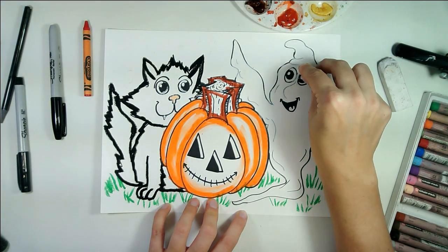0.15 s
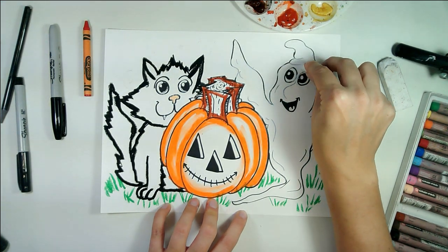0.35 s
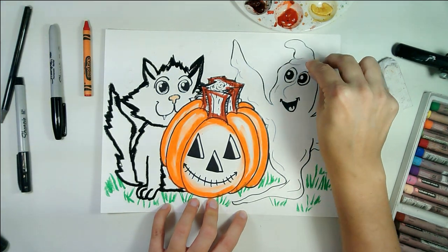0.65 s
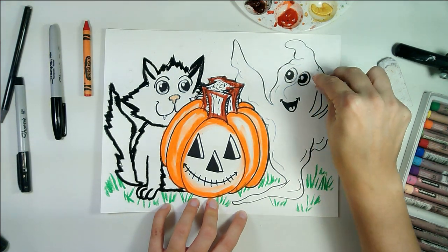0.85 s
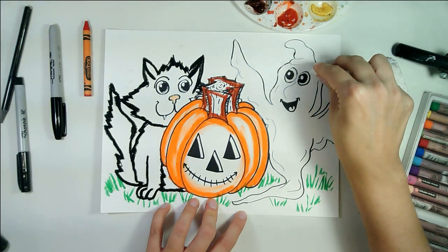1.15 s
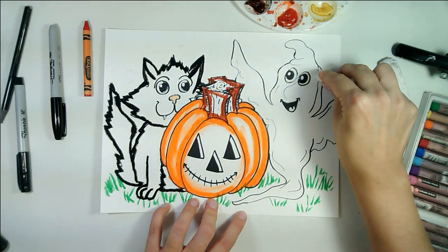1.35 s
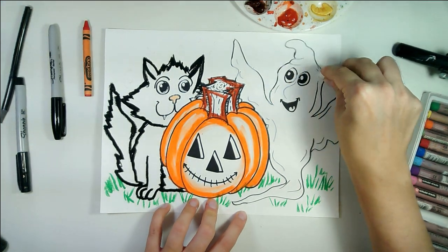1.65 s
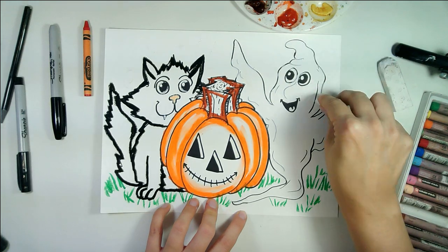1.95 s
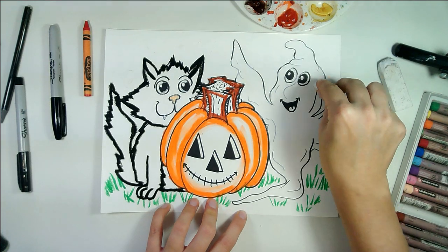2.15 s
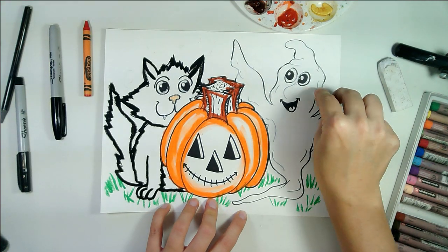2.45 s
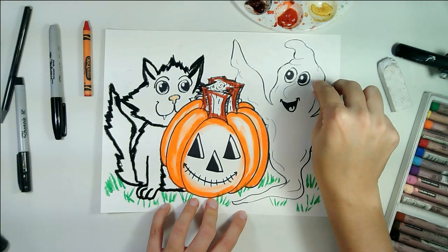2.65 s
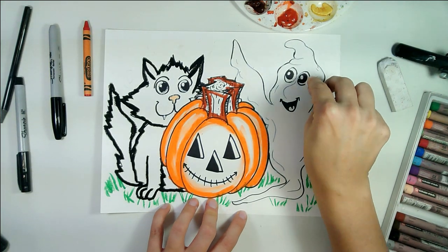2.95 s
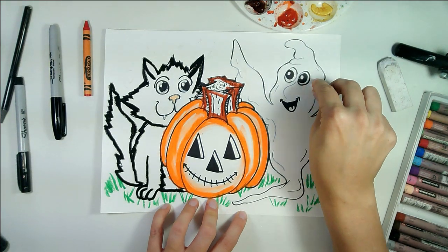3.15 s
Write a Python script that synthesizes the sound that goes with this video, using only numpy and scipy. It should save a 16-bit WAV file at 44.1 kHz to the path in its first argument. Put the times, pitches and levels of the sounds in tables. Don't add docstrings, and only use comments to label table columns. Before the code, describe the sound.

Rapid short scratchy strokes of a waxy stick on paper, with dull desk bumps and faint hum

```python
import sys
import numpy as np
from scipy import signal
from scipy.fft import rfft, irfft
from scipy.io import wavfile
from scipy.ndimage import uniform_filter1d

SR = 44100
rng = np.random.default_rng(int(sys.argv[2]) if len(sys.argv) > 2 else 0)


def field_ratio(decibels):
    return 10 ** (np.asarray(decibels, dtype=float) / 20)


def master(y):
    cut = np.clip(np.atleast_2d(y).T, -1, 1)
    pcm = np.round(cut * 32767)
    wavfile.write(sys.argv[1], SR, pcm.astype(np.int16))


N = 145530

# start t/s, length/s, effort/dB, low sheet ring/dB, lean/ratio (under 1: fastest early)
STROKES = [(-.06, 0.13, -68, 2.5, 0.81), (0.061, 0.16, -75.5, 4.5, 0.82), (0.218, .16, -68.5, 3.5, 1.26),
           (0.384, 0.17, -77, 2, 0.47), (0.512, 0.14, -68, 3.5, 1.24), (0.659, 0.15, -71, -2, 1),
           (0.802, .12, -67, 2, 1.05), (0.922, 0.15, -69, -2.5, 0.76), (1.058, .12, -68, 1, 1.1),
           (1.169, 0.13, -74.5, -0.5, 0.87), (1.286, .11, -77.5, -1.5, 1.1), (1.397, 0.097, -82, 1, .7),
           (1.503, 0.1, -76, -2, 0.94), (1.61, 0.08, -89, 3, .95), (1.717, 0.12, -84.5, 1, 0.72)]
LATER_STROKES = [(1.848, 0.099, -77, -1, 1.03), (1.972, 0.083, -81, -0.5, 1.5),
                 (2.087, 0.092, -74.5, 0, 1.45), (2.206, 0.09, -77, -2, 1.26),
                 (2.323, 0.1, -76.5, -1.5, 1.2), (2.425, 0.13, -78.5, 0.5, .9),
                 (2.568, 0.16, -66.5, -4.5, 1.18), (2.725, 0.14, -71, -3.5, 0.91),
                 (2.865, 0.15, -70, -3.5, .85), (3, 0.15, -70, -4, .85), (3.139, 0.14, -73.5, -3, 1.1),
                 (3.28, .12, -75, -2, 0.9)]
# f/Hz, width/Hz, level/dB
SHEET_LOW = [(4212, 960, -7.5), (4796, 1180, -6.5)]
SHEET_HIGH = [(5420, 1060, -9.5), (6230, 720, -15), (7990, 1320, -10), (8830, 940, -11), (3416, 760, -16.5),
              (1313, 1250, -5.5)]
SHEET_AIR = [(11440, 3300, -8.5), (14800, 2800, -8.5), (16300, 900, -17)]
# t/s, level/dB, f/Hz, length/s
KNOCKS = [(0.189, -64, 1124, 0.039), (.19, -70, 1810, 0.044), (.78, -65.5, 1200, .05),
          (2.113, -65.5, 640, 0.011), (2.131, -69, 780, 0.035), (3.227, -70.5, 1100, 0.026),
          (2.125, -67, 1120, 0.046), (2.125, -68, 1540, 0.037), (2.12, -70, 1836, 0.062),
          (3.08, -72, 610, .03), (3.112, -71.5, 1060, 0.031)]
# start t/s, level/dB, f/Hz
SHOVES = [(-.04, -60, 142), (0.099, -60.5, 151), (.24, -69, 92), (0.412, -59, 168), (0.542, -59, 85.5),
          (0.679, -56, 120), (.72, -56.5, 193), (0.828, -58, 84), (0.961, -51.5, 139), (1.089, -64, 120),
          (1.218, -63, 120), (1.51, -64.5, 155), (1.752, -71, 120), (1.879, -71, 149), (1.99, -69.5, 128),
          (2.101, -61.5, 134), (2.229, -59.5, 137), (2.351, -67, 86.5), (2.45, -63.5, 113),
          (2.628, -55, 130), (2.785, -55, 165), (2.898, -58.5, 87), (3.02, -49.5, 93), (3.055, -50, 133),
          (3.178, -59, 102)]
# f/Hz, width/Hz, level/dB
DESK_MODES = [(83.6, 12.7, 2.5), (120, 31, 1.5), (165, 28.7, 0), (187.7, 27.5, -4), (316, 88, -7.5)]
# t/s, level/dB
SWAY_LEVEL = [(0.0, -41.5), (0.16, -30.5), (0.39, -43), (0.43, -33.5), (0.65, -35.5), (0.84, -27.5),
              (0.87, -42), (1.08, -29), (1.33, -38.5), (1.96, -42), (1.98, -34.5), (2.41, -38), (2.59, -30),
              (2.64, -42), (2.82, -29.5), (2.84, -35), (3.27, -33.5), (3.3, -42.5)]
# f/Hz, level/dB
STAND_SPECTRUM = [(3, -16), (8, -1.5), (20, 6.5), (27, 0), (31, -11.5), (36, -27.5), (60, -45), (75, -62)]
# t/s, level/dB
ARM_LEVEL = [(0.0, -72), (0.94, -73), (1.53, -78), (1.89, -78.5), (2.21, -75.5), (2.46, -74.5),
             (2.78, -74.5), (2.99, -74), (3.3, -76.5)]
# f/Hz, level/dB
DRAG_SPECTRUM = [(36, -33.5), (62, 2.5), (173, -6.5), (216, -11), (443, -13), (481, -16), (522, -19.5),
                 (700, -19), (910, -22.5), (1540, -120)]
# f/Hz, level/dB
FAN_SPECTRUM = [(290, -61), (500, -22), (554, -5.5), (1510, -2.5), (2370, -15.5), (3180, -18.5),
                (4990, -23), (5290, -24), (16200, -34)]
# t/s, level/dB
FAN_SWELL = [(0.0, -69.5), (0.36, -67.5), (0.78, -67.5), (1.11, -70), (1.63, -69), (2.3, -67.5),
             (2.63, -70.5), (3.3, -68)]
# f/Hz, level/dB
FAN_LINES = [(1201, -83.5), (1322, -82.5), (1561, -94), (1841, -97.5), (2090, -95.5)]


def evened(x):
    return x / np.sqrt(np.mean(x ** 2) + 1e-30)


def curve(points):
    t_s, value = np.transpose(points)
    return np.interp(np.arange(N) / SR, t_s, value)


def deviation(points):
    value = curve(points)
    return value - value.mean()


def wander(ms):
    span = max(int(ms * SR / 1000), 1)
    return evened(uniform_filter1d(uniform_filter1d(rng.standard_normal(N), span), span))


def resonate(x, f_hz, width_hz):
    turn = np.exp(2j * np.pi * np.cumsum(f_hz * np.ones(len(x))) / SR)
    r = np.exp(-np.pi * width_hz / SR)
    return 2 * (turn * signal.lfilter([1 - r], [1, -r], x / turn)).real


def resonate_twice(x, f_hz, width_hz):
    return resonate(resonate(x, f_hz, width_hz), f_hz, width_hz)


def coloured(points):
    hz = np.fft.rfftfreq(N, 1 / SR) + 0.0024
    f_hz, level_db = np.transpose(points)
    gain = field_ratio(np.interp(np.log(hz), np.log(f_hz), level_db, -90, -90))
    return evened(irfft(rfft(rng.standard_normal(N)) * gain, N))


def add(mix, t_s, sound):
    at = round(t_s * SR)
    part = mix[max(at, 0):][:len(sound) + min(at, 0)]
    part += sound[max(-at, 0):][:len(part)]


def tooth_ticks():
    ticks_per_s, spread_db, tremor_db = 30000, 1.2, .5
    ticks = rng.standard_normal(N) * field_ratio(spread_db * rng.exponential(1, N).clip(0, 4))
    ticks = evened(ticks * (rng.random(N) < ticks_per_s / SR))
    return ticks * field_ratio(tremor_db * wander(15))


def rubbing():
    speed_power, low_power = 1.19, 0.83
    air_tilt, drift = 0.35, 0.011
    force, low, air = np.zeros((3, N))
    for start_s, length_s, effort_db, low_db, lean in STROKES + LATER_STROKES:
        phase = np.linspace(0, 1, round(length_s * SR)) ** lean
        speed = np.sin(np.pi * phase).clip(0) ** speed_power
        add(air, start_s, field_ratio(effort_db - air_tilt * low_db) * speed)
        add(force, start_s, field_ratio(effort_db) * speed)
        add(low, start_s, field_ratio(effort_db + low_db) * speed ** low_power)
    ticks = tooth_ticks()
    shift = 1 + drift * wander(40)
    out = np.zeros(N)
    for push, rings in ((low, SHEET_LOW), (force, SHEET_HIGH), (air, SHEET_AIR)):
        for k, (f_hz, width_hz, level_db) in enumerate(rings):
            ring = evened(resonate_twice(ticks, f_hz * shift, width_hz))
            out += (-1) ** k * field_ratio(level_db) * push * ring
    return out


def knocks():
    rise_ratio, width_ratio = .35, .22
    out = np.zeros(N)
    for t_s, level_db, f_hz, length_s in KNOCKS:
        t = np.arange(round(3 * length_s * SR)) / SR
        rattle = evened(resonate_twice(rng.standard_normal(len(t)), f_hz, width_ratio * f_hz))
        shape = np.minimum(t / (rise_ratio * length_s), 1) * np.exp(-(t / length_s) ** 2)
        add(out, t_s, field_ratio(level_db - 7.5) * evened(rattle * shape))
    return out


def nearby(x):
    t60_s, level_db, turns_per_s = .05, -6, 3.1
    t, out = np.arange(4096) / SR, x.copy()
    for k in range(3):
        tail = rng.standard_normal(len(t)) * field_ratio(-60 * t / t60_s) * (t > .001)
        share = np.sqrt(2 / 3) * np.cos(np.pi * (turns_per_s * np.arange(N) / SR + k / 3))
        out += field_ratio(level_db) * signal.oaconvolve(share * x, tail / np.linalg.norm(tail))[:N]
    return out


def desk():
    rise_s, t60_s, off_mode_db_per_octave = 0.031, .2, -7.5
    out, t = np.zeros(N), np.arange(round(.3 * SR)) / SR
    late_s = np.maximum(t - rise_s, 0)
    shape = field_ratio(-60 * late_s / t60_s) * np.sin(np.pi / 2 * np.minimum(t / rise_s, 1)) ** 2
    for start_s, level_db, pitch_hz in SHOVES:
        thud = np.zeros(len(t))
        for f_hz, width_hz, mode_db in DESK_MODES:
            noise = rng.standard_normal(2 * len(t))
            ring = resonate(resonate(noise, f_hz, width_hz), f_hz, 2 * width_hz)
            ring = ring[len(t):]
            off_db = off_mode_db_per_octave * abs(np.log2(f_hz / pitch_hz))
            thud += field_ratio(mode_db + off_db) * evened(shape * ring)
        add(out, start_s, field_ratio(level_db - 8) * evened(thud))
    return out


def stand():
    post_hz, post_width_hz, post_db = 46.6, 13, -59.5
    sway = coloured(STAND_SPECTRUM)
    power = uniform_filter1d(uniform_filter1d(sway ** 2, round(.1 * SR)), round(0.15 * SR))
    held = np.sqrt(power.clip(0)) + 0.37
    post = evened(resonate_twice(rng.standard_normal(N), post_hz, post_width_hz))
    post *= field_ratio(post_db + 1.9 * deviation(ARM_LEVEL))
    return field_ratio(curve(SWAY_LEVEL)) * evened(sway / held) + post


def arm_drag():
    drag_db, hollow_hz, hollow_width_hz, hollow_db = -67, 310, 90., -13.5
    arm_db = deviation(ARM_LEVEL)
    hollow = evened(resonate_twice(rng.standard_normal(N), hollow_hz, hollow_width_hz))
    drag = coloured(DRAG_SPECTRUM) + field_ratio(hollow_db + 0.85 * arm_db) * hollow
    return field_ratio(drag_db + arm_db + 0.69 * wander(80)) * drag


def fan():
    hiss_db, flutter_db = -72.5, .9
    level_db = hiss_db + deviation(FAN_SWELL) + flutter_db * wander(33)
    out = field_ratio(level_db) * coloured(FAN_SPECTRUM)
    for f_hz, line_db in FAN_LINES:
        out += field_ratio(line_db) * evened(resonate(rng.standard_normal(N), f_hz, 15.0))
    return out


def scene():
    close = nearby(rubbing() + knocks())
    return (close + desk() + stand() + arm_drag() + fan())[None]


def low_pass(x):
    return signal.sosfilt(signal.butter(12, 16380, fs=SR, output="sos"), x)


def record(dry):
    return low_pass(dry)


dry = scene()
out = record(dry)
master(out)
```